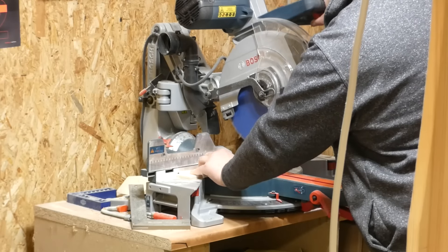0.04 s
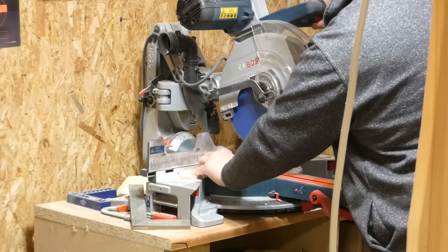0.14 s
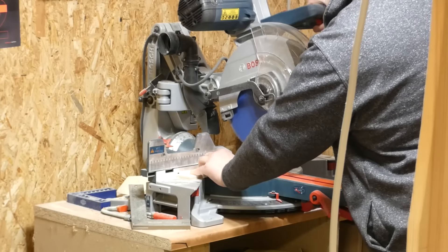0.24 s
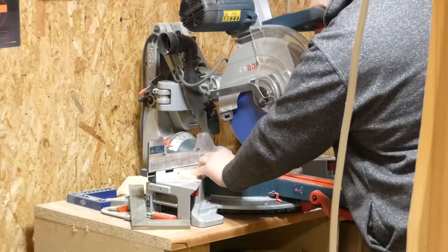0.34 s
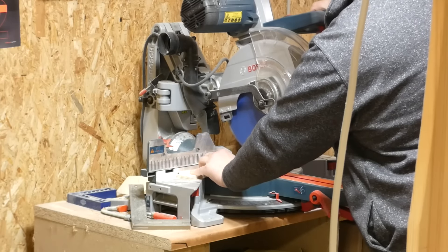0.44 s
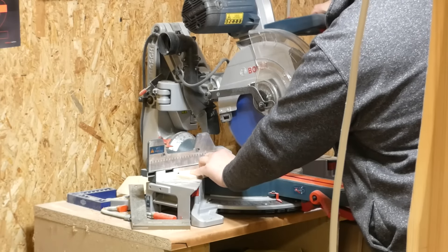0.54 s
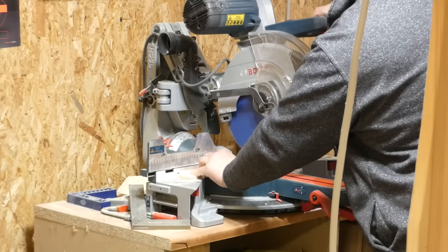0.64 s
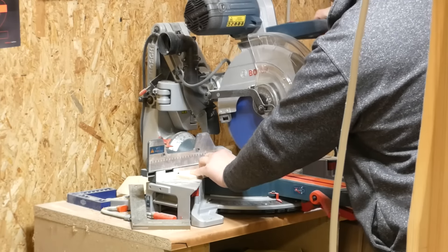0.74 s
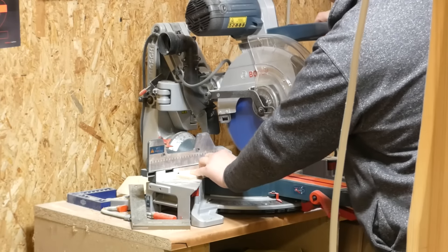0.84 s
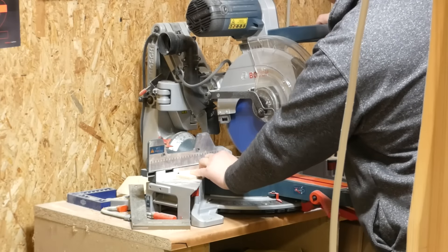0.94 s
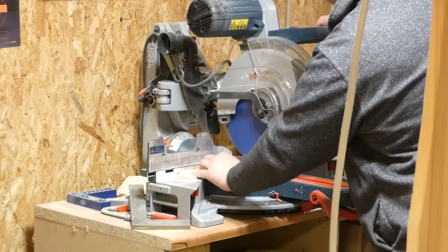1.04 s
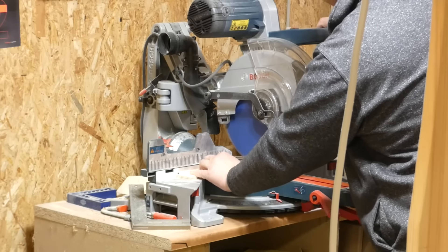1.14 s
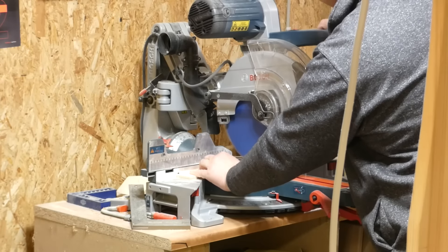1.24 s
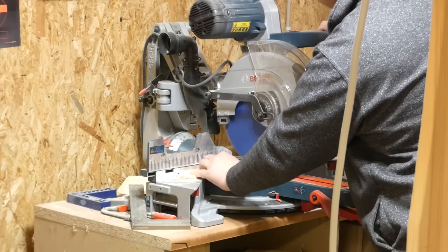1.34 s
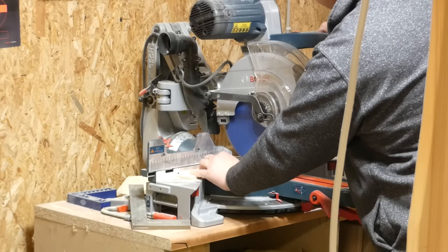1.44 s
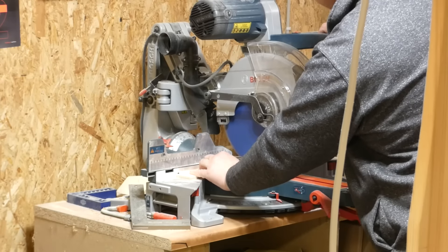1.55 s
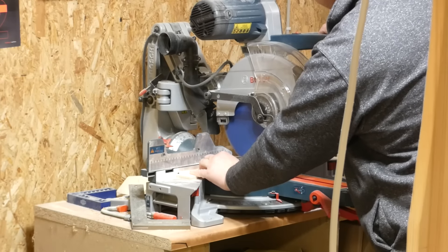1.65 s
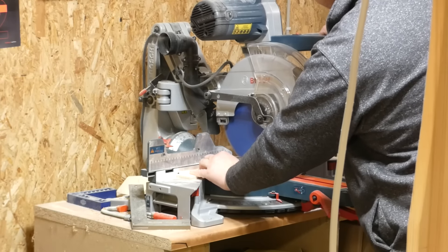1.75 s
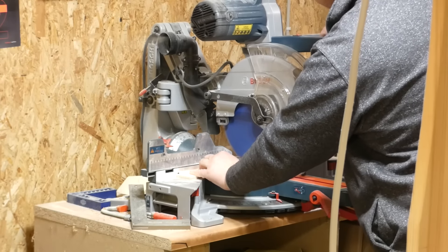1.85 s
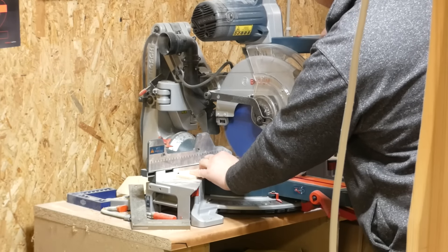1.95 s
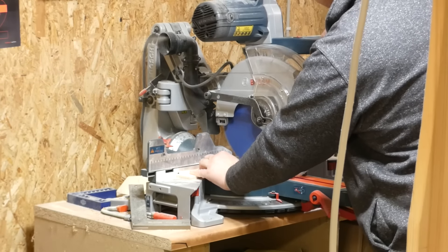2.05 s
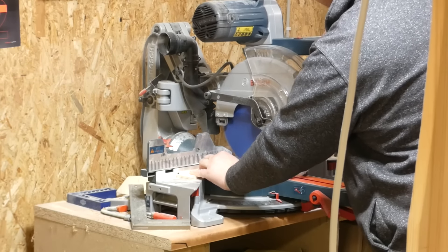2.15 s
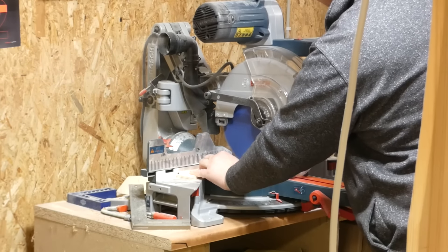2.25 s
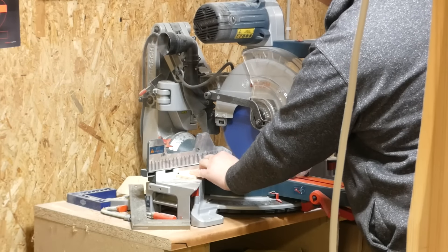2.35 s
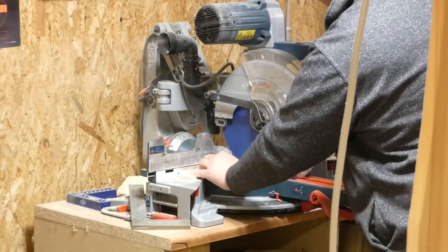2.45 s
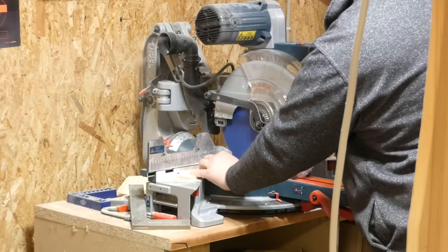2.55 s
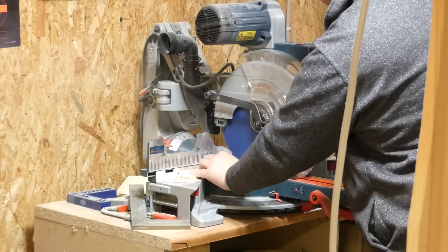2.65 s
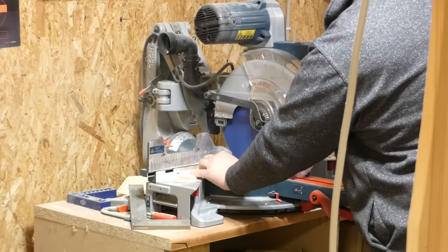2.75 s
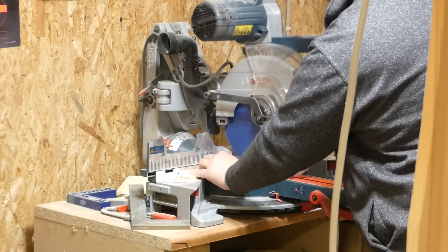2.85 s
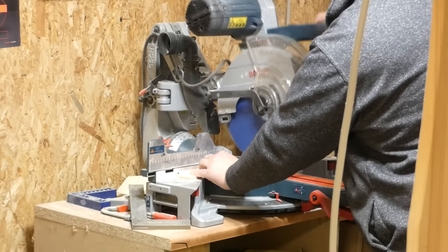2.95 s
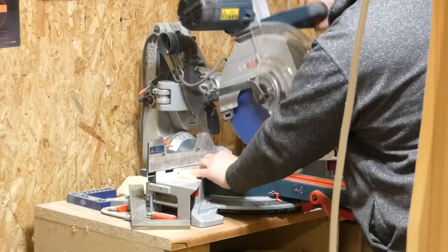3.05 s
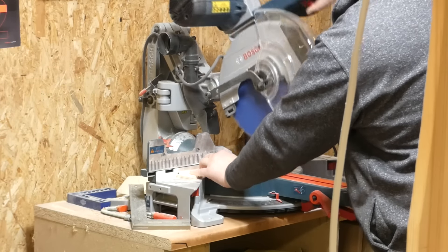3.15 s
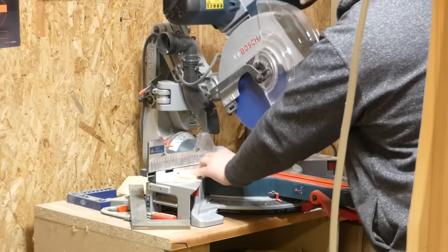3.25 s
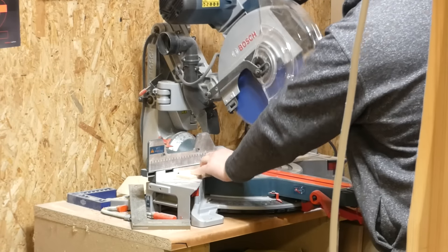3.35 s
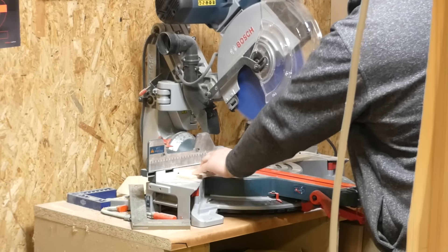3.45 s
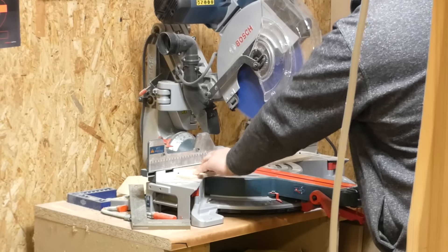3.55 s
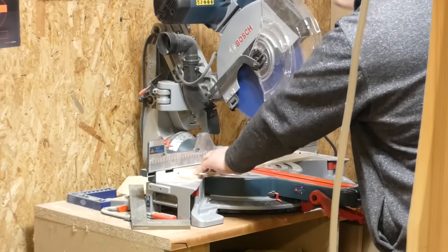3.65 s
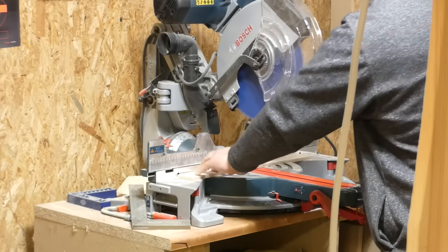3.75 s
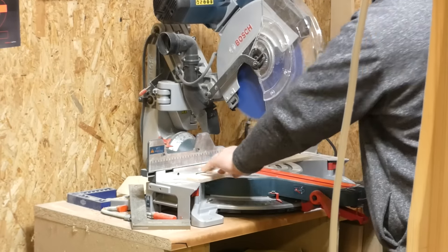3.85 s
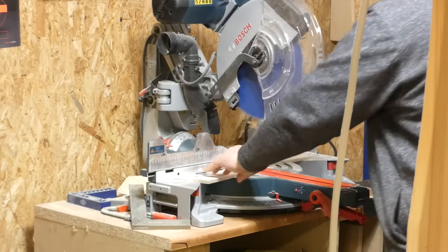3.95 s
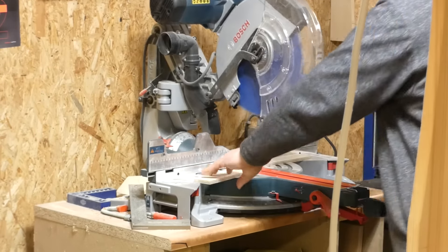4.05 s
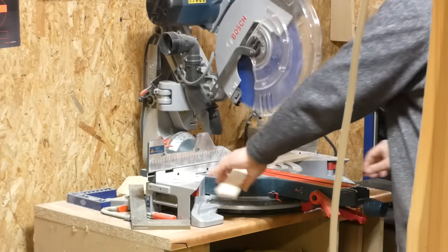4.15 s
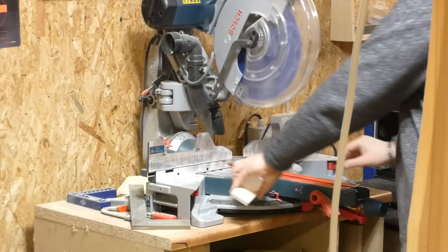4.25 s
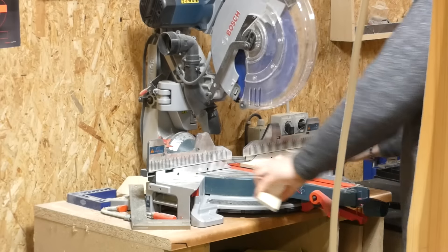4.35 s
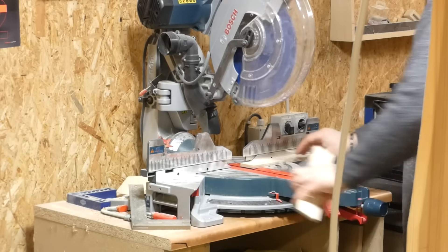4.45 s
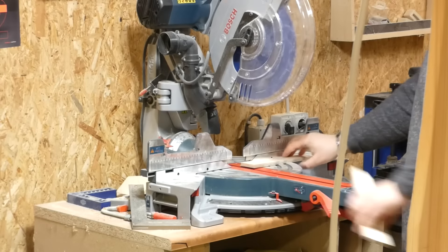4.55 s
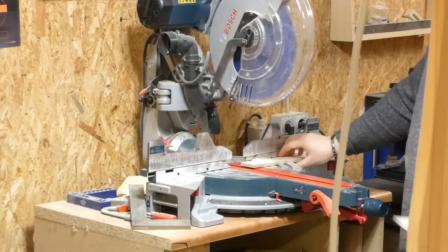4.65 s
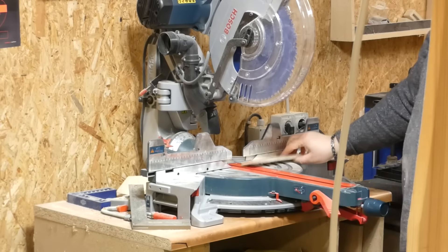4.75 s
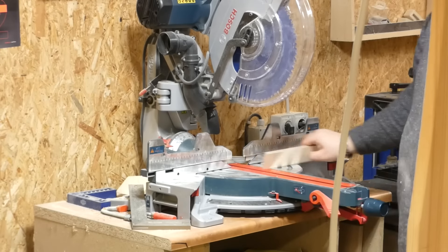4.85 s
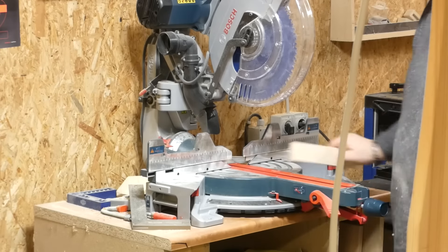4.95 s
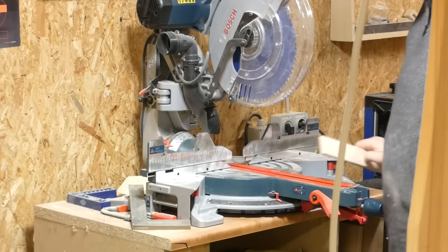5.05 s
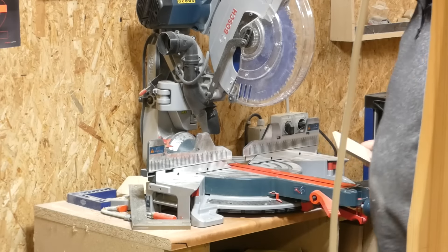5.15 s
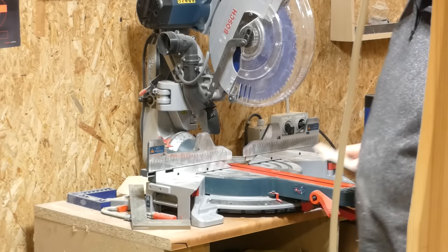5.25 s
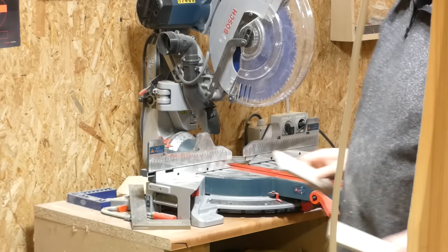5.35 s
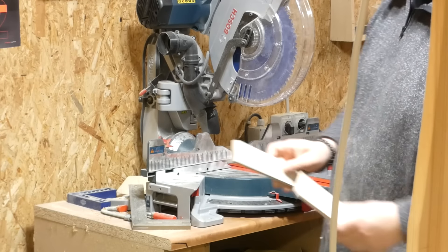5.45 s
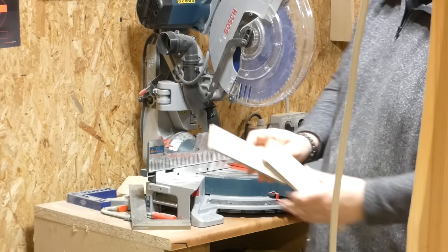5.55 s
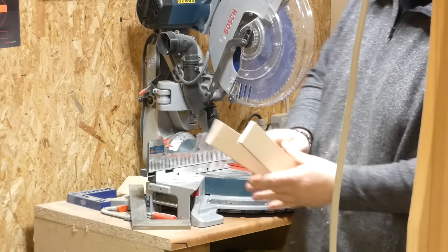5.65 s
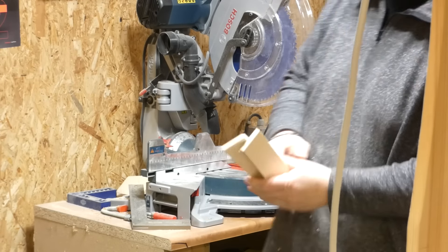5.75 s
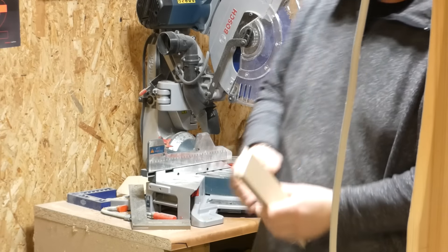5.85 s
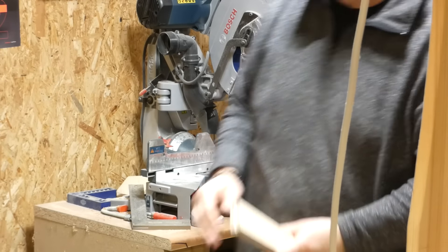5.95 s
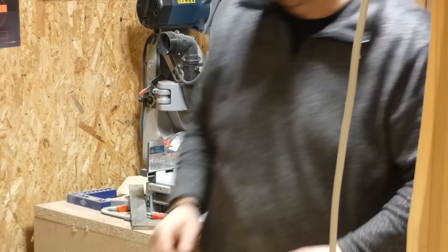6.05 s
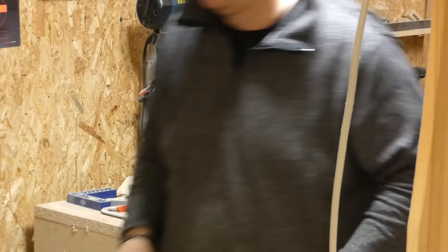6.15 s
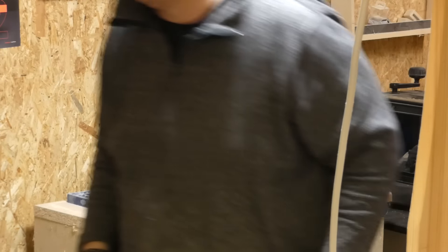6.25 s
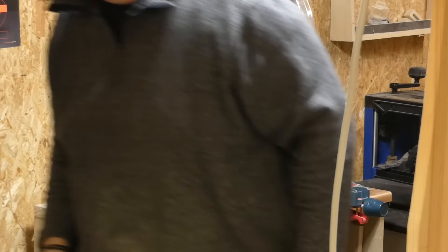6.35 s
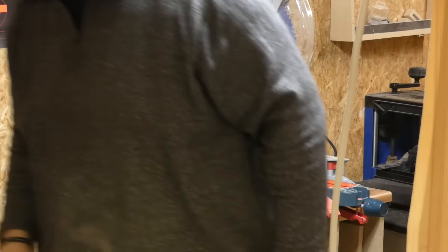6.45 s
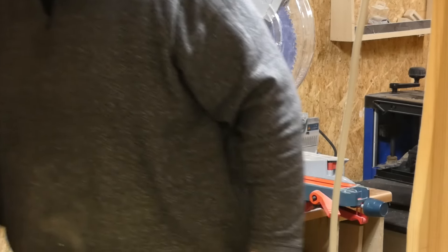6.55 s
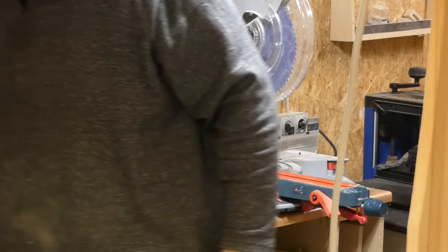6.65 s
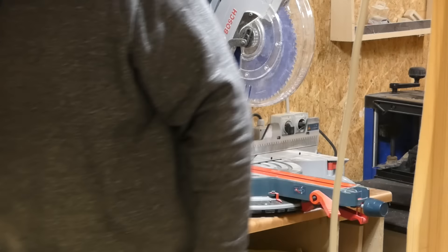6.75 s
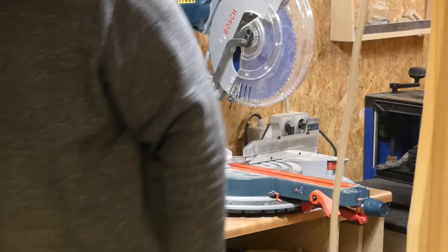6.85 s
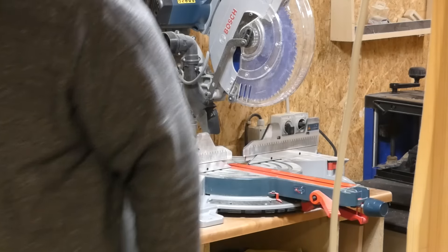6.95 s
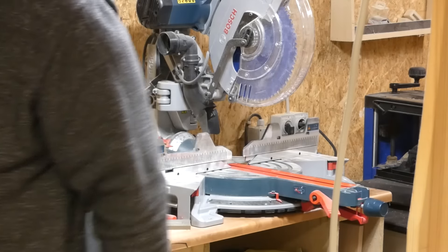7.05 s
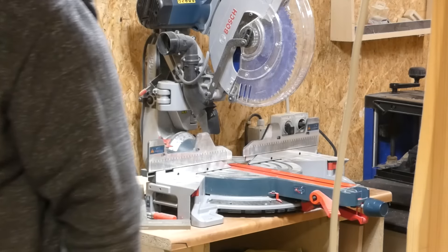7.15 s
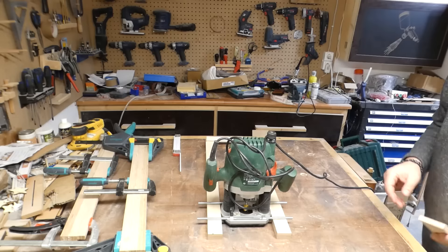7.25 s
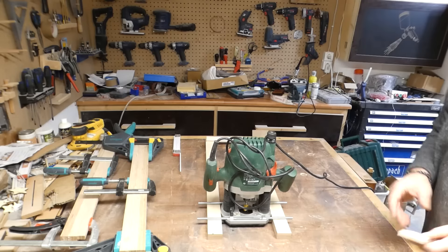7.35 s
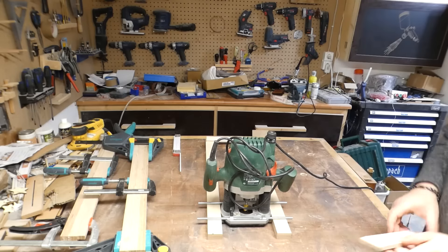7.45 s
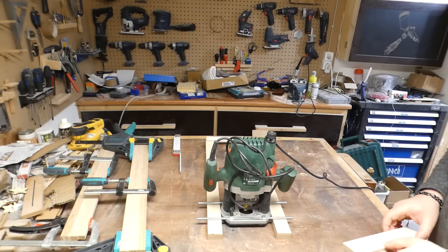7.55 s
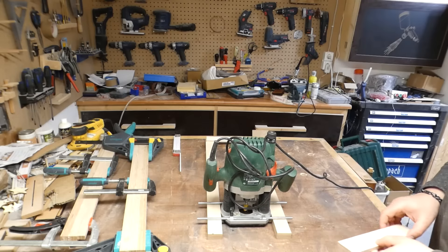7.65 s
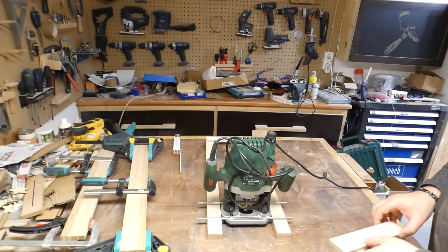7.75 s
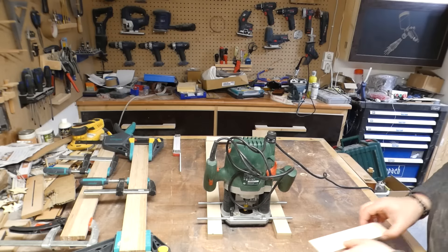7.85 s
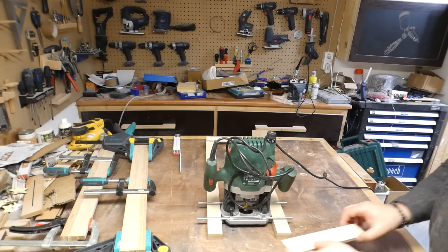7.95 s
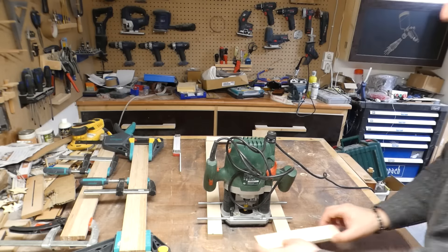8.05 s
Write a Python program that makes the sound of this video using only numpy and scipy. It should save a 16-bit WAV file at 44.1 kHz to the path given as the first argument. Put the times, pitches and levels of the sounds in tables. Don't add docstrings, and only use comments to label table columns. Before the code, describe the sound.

Loud electric saw runs up, bites through wood, slaps and winds down; the head rattles, strips clap sharply, cloth rustles, pieces knock on a bench.

```python
import sys
import numpy as np
from scipy import signal
from scipy.fft import rfft, irfft, next_fast_len
from scipy.io import wavfile
from scipy.ndimage import uniform_filter1d

SR = 44100
rng = np.random.default_rng(int(sys.argv[2]) if len(sys.argv) > 2 else 0)


def to_wav(sig):
    pcm = np.clip(np.atleast_2d(sig), -1, 1) * 32767
    pcm = np.round(pcm).astype(np.int16)
    wavfile.write(sys.argv[1], SR, pcm.T)


def gain_from_decibels(decibels):
    exponent = np.asarray(decibels, float) / 20
    return 10 ** exponent


N = 356622
T = np.arange(N) / SR
RUN = int(4.5 * SR)
FREE_TURNS_S = 292
INRUSH_S, SWITCH_OFF_S, GRAB_S = 0.55, 3.265, .08
FULL_BITE_DB = -40
FADE_S = .07

# frequency [Hz], width [Hz], level [dB].
HOUSING = [(482.5, 13, -2), (563, 8.3, -13), (671, 12, -5.5), (867, 32, -9), (1420, 28, -38),
           (1720, 20, -37), (2050, 87, -19), (2920, 220, -9.5), (4820, 60, -3), (5580, 57, -4),
           (6770, 91, -6.5)]


def columns(table):
    s, *rest = np.transpose(table)
    return [np.interp(T, s, c) for c in rest]


def unit(x):
    return x / np.sqrt(np.mean(x ** 2))


def pan(db):
    return gain_from_decibels([[db / 2], [-db / 2]])


def colour(x, points, lo_hz=1, hi_hz=30000):
    size = next_fast_len(x.shape[-1])
    f = np.arange(size // 2 + 1) * SR / size + 1
    hz, db = np.transpose(points)
    gain = gain_from_decibels(np.interp(np.log(f), np.log(hz), db))
    gain = gain / np.sqrt((1 + (lo_hz / f) ** 6) * (1 + (f / hi_hz) ** 6))
    return irfft(rfft(x, size) * gain, size)[..., :x.shape[-1]]


def band(x, lo_hz=1, hi_hz=30000):
    return colour(x, [(1, 0)], lo_hz, hi_hz)


def resonate(x, peaks):
    return sum(gain_from_decibels(db) * signal.lfilter(*signal.iirpeak(hz, hz / max(width, 4), SR), x)
               for hz, width, db in peaks)


def walk(rate, size=N):
    steps = uniform_filter1d(rng.standard_normal(int(size / SR * rate * 2) + 3), size=2)
    return 1.377 * np.interp(T[:size] * rate * 2, np.arange(len(steps)), steps)


def noise(grain_db=0., size=N):
    return rng.standard_normal(size) * gain_from_decibels(grain_db * walk(900, size=size))


def ring(modes, length_s, scatter):
    t = T[:int(length_s * SR)]
    out = np.zeros(len(t))
    for (hz, db, t60), sign in zip(modes, np.sign(scatter)):
        envelope = np.minimum(t * hz, 1) * gain_from_decibels(-60 * t / max(t60, .003))
        out += sign * gain_from_decibels(db) * np.sin(2 * np.pi * hz * t) * envelope
    return out


def add(out, s, x, pan_db=0):
    i = int(s * SR)
    x = x[:N - i]
    out[:, i:i + len(x)] += x * pan(pan_db)


def bursts(s, db, rise_s, fall_s):
    t = T[::64, None]
    away = np.maximum((s - t) / rise_s, (t - s) / fall_s)
    return np.interp(T, t[:, 0], gain_from_decibels(db - 20 * away).sum(axis=1))


def room(x):
    # centre [Hz], t60 [s], side share [ratio].
    bands = [(58.9, 0.17, .9), (198, 0.88, 0.51), (600, 0.42, 0.88), (2024, 0.55, 0.68), (4300, 0.55, 0.2),
             (8500, 0.14, 0.35), (12000, 0.074, 2.1)]
    # delay [s], level [dB], side [signed].
    echoes = [(.0036, -11.5, 1.1), (.009, -10.5, -1.4), (.016, -7, 1.1), (.033, -7, -1.1)]
    wet_db = -5.5
    t = T[:SR // 2 + 8000]
    mid_side = 0
    for hz, t60, share in bands:
        grain = band(rng.standard_normal((2, len(t))), hz / 2.4, hz * 1.76)
        mid_side = mid_side + grain * gain_from_decibels(-60 * t / t60) * [[1], [share]]
    mid, side = mid_side
    tail = (mid + side * np.array([[1], [-1]])) * np.clip((t - .003) / 0.0041, 0, 1)
    tail = gain_from_decibels(wet_db) * tail / np.sqrt(np.sum(tail ** 2) / 2)
    for s, db, wall in echoes:
        tail[:, int(s * SR)] += gain_from_decibels(db - 13.0 + 2 * wall * np.array([1, -1]))
    return x + signal.fftconvolve(x.mean(axis=0)[None], tail, axes=1)[:, :N]


def mains_hum():
    hum_hz, bench_s = 200.2, 7.275
    run_db, inrush_db, inrush_s = -55, 20.5, 0.334
    idle_db, swell_db, swell_s, bench_db = -65, 9, 1, -47
    motor = gain_from_decibels(run_db + inrush_db * np.exp(-T / inrush_s))
    motor = motor * np.clip(1 - (T - SWITCH_OFF_S) / 0.13, 0, 1)
    swell = np.clip((T - bench_s) / swell_s + 1, 0, 1)
    idle = gain_from_decibels(idle_db + swell_db * swell) * (T > SWITCH_OFF_S)
    bench = gain_from_decibels(bench_db) * np.clip((T - bench_s) / 0.025 + 1, 0, 1)
    hum = (motor + idle + bench) * gain_from_decibels(1.0 + 0.41 * walk(15)) * np.sin(2 * np.pi * hum_hz * T)
    return hum * gain_from_decibels([[-1.8], [1.2]])


def still_air():
    # frequency [Hz], density [dB per Hz].
    spectrum = [(12, -54), (20, -31), (150, -4.5), (198, -4.5), (347, -9), (825, -16), (1090, -14.5),
                (1400, -18.5), (2990, -21), (3440, -30), (9670, -29), (14700, -48.5), (16000, -46.5)]
    air_db = -59
    mid, side = colour(rng.standard_normal((2, N)), spectrum)
    air = unit(mid + 0.67 * side * np.array([[1], [-1]])) * pan(-4)
    return gain_from_decibels(air_db) * air * np.clip((T[-1] - T) / FADE_S, .5, 1)


def rustle():
    # start [s], rustle [dB], low scuff [dB], fall [s per 20 dB].
    moves = [(5.315, -73.5, -61, 1), (5.495, -65.5, -78, 0.03), (5.735, -51, -42.5, -0.01),
             (5.95, -69, -69, 0.32), (6.098, -69, -53, 0.1), (6.286, -74, -69.5, 0.05),
             (6.402, -65.5, -54, 0.05), (6.68, -70, -54.5, 0.14), (6.852, -80, -65, 0.5),
             (6.984, -56, -48, 0.02), (7.027, -73, -43.5, 0.2), (7.14, -67, -74, 0.5),
             (7.273, -61, -40, 0.05), (7.453, -60, -48, 0.15), (7.63, -62, -46, .2),
             (7.39, -52, -39.5, 0.06), (7.543, -53, -39.5, 0.12), (7.724, -56, -51, 0.17),
             (7.816, -42.5, -23.5, 0.06), (7.863, -59, -39, 0.07), (7.902, -54.5, -44, 0.07),
             (7.962, -57.5, -55, 0.14), (8.02, -58, -59, 0.1)]
    # frequency [Hz], density [dB per Hz].
    cloth = [(530, -31), (900, -8.5), (1760, -11), (2130, -6), (3870, -6.5), (4210, -4.5), (11900, -19.5),
             (15000, -41)]
    s, hiss_db, scuff_db, fall_s = np.transpose(moves)
    rise_s = 0.71 * fall_s
    hiss = unit(colour(noise(grain_db=2.5), cloth, lo_hz=1500))
    scuff = unit(band(noise(grain_db=3.), lo_hz=250, hi_hz=1500))
    return bursts(s, hiss_db + 8.5, rise_s, fall_s) * hiss + bursts(s, scuff_db - 6.5, rise_s, fall_s) * scuff


def knock(hz, spread, t60, chance):
    place = np.linspace(-1, 1, 14) + chance[0] / 14
    mode_hz = hz * 2 ** (spread * place)
    mode_db = 4 * chance[1] - 9 * place ** 2
    thud = ring(np.c_[mode_hz, mode_db, t60 * 2 ** (.5 * chance[2])], .25, chance[2])
    t = T[:len(thud)]
    thud *= np.clip(t / min(.3 / (hz * spread ** 1.5), .002), 0, 1) * np.clip((t[-1] - t) / .08, 0, 1)
    contact = signal.lfilter([1], [1, -.7], rng.standard_normal(900)) * gain_from_decibels(-60 * T[:900] / 0.016)
    thud[:900] += 0.4 * min(spread, 1) ** 2 * contact
    edges_hz = [hz * 2 ** -spread / 2, min(hz * 2 ** spread * 3, 15000)]
    thud = signal.sosfilt(signal.butter(2, edges_hz, "band", fs=SR, output="sos"), thud)
    return thud / np.abs(thud).max()


def knocks():
    # start [s], peak [dB], pitch [Hz], spread [octaves], t60 [s].
    thuds = [
        (4.6, -45, 144, 0.26, 0.65),
        (4.8, -48, 140, 0.24, 0.6),
        (5.43, -62.5, 65.6, 0.27, .46),
        (6.98, -54, 95, 0.45, .2),
        (7.37, -46, 121, 0.38, 0.2),
        (7.83, -55, 80, 0.5, 0.3),
    ]
    bench = [(6.102, -36.5, 225, 0.82, 0.11), (6.103, -39, 698, 1.35, 0.066),
             (6.9507, -36.5, 503, 1.42, 0.094), (6.97, -47, 1620, 1.5, 0.037), (7.002, -38, 1540, 1, .04),
             (7.021, -32.5, 389, 1.33, 0.091), (7.024, -30, 1803, 1.3, 0.039),
             (7.036, -38, 2400, 0.92, 0.051), (7.252, -30.5, 843, 0.63, 0.067),
             (7.253, -37, 2190, 0.55, 0.047), (7.362, -31.5, 480, 0.79, 0.2), (7.525, -33, 4400, 1.3, .03),
             (7.5525, -24, 2870, 0.61, 0.026), (7.558, -30, 2700, 0.54, 0.037),
             (7.612, -35, 600, 0.83, 0.12), (7.788, -39, 805, 0.93, 0.06), (7.803, -36, 905, 2.2, 0.06),
             (7.817, -22, 901, 1.85, 0.06), (7.826, -26, 227, 0.56, 0.13), (7.848, -33, 296, 1.27, 0.094),
             (7.868, -35, 302, 1.06, 0.08), (7.885, -38, 323, 1.34, 0.08), (7.994, -31, 627, 0.48, 0.032)]
    at_saw = [(4.334, -23, 3000, 1.63, 0.024), (4.339, -26, 694, 0.9, .03), (4.4575, -27, 1860, 0.26, .06),
              (4.547, -37, 8000, 0.63, .012), (4.547, -26, 3900, 0.28, 0.02),
              (4.584, -29, 1800, 1.4, 0.059), (4.588, -37, 665, 0.42, .09), (4.765, -43, 563, 0.44, 0.087),
              (5.46, -51, 2880, 0.044, 0.38), (5.47, -52, 1630, 0.13, 0.13),
              (5.589, -50.5, 712, 0.38, 0.36)]
    catch = [
        (4.83, -45, 4220, .12, .06),
        (4.848, -40, 4220, .12, .04),
        (4.863, -25, 4200, .11, .018),
        (4.863, -30, 6150, .11, .018),
        (4.863, -39, 8000, .07, .014),
        (4.87, -43, 4200, .1, .1),
        (4.863, -36, 2300, .4, .03),
    ]
    gear_slaps = [
        (.004, -19, 650, .3, .2),
        (.004, -21, 1780, .08, .09),
        (3.257, -15, 2280, .1, .02),
        (3.304, -10, 2050, .07, .018),
        (3.327, -16, 2050, .1, .018),
    ]
    out = np.zeros((2, N))
    groups = [(thuds, -3), (bench, -3), (at_saw, -0.5), (catch, -0.5), (gear_slaps, 0)]
    for rows, pan_db in groups:
        for s, db, hz, spread, t60 in rows:
            chance = rng.uniform(-1.2, 1, (3, 14))
            add(out, s, gain_from_decibels(db) * knock(hz, spread, t60, chance), pan_db)
    return out


def strip_clap():
    # start [s], peak [dB].
    contacts = [
        (5.751, -4.5),
        (5.7543, -7),
        (5.76, -12),
    ]
    # frequency [Hz], level [dB], t60 [s].
    strip = [(1585, -10, .012), (2050, -10, .007), (2350, -10, .008), (2880, 0, .028), (3120, 0, .01),
             (3375, -1, .008), (3695, -5, .008), (4270, -6, .03), (4390, -6, .024), (4590, -9, .012),
             (5146, -4, .007), (5850, -5, .006), (6600, -9, .007), (9800, -16, .003)]
    out = np.zeros((2, N))
    edges = signal.butter(2, [250, 8000], "band", fs=SR, output="sos")
    for s, db in contacts:
        chance = rng.standard_normal(len(strip))
        clap = ring(np.array(strip) + np.outer(chance, [25, 1, 0]), .1, chance)
        clap[:400] += 0.75 * rng.standard_normal(400) * gain_from_decibels(-60 * T[:400] / 0.0047)
        add(out, s, gain_from_decibels(db) * signal.sosfilt(edges, clap))
    return out


def rattle():
    # time [s], frame ring [dB], rattle hiss [dB].
    bounces = [(4.342, -23.5, -38), (4.361, -20.5, -24.5), (4.387, -27, -38), (4.43, -47, -58),
               (4.474, -33, -32), (4.54, -47, -34), (4.597, -26, -30), (4.66, -46, -57),
               (4.765, -39.5, -50), (4.81, -42, -44), (4.872, -42, -33.5), (5.49, -75, -62),
               (5.595, -53, -65)]
    # frequency [Hz], width [Hz], level [dB].
    frame_modes = [(161, 16, -18), (209.7, 43, -13), (430, 13, -14), (490, 8, 1), (576, 45, 5),
                   (654, 7, -5.5), (712, 19.6, 4), (870, 13, -0.5), (950, 51, -10), (997, 14, -22),
                   (1200, 46, -14.5), (1540, 26, -23), (1767, 28, -10), (2620, 61, -17.5), (2800, 55, -26),
                   (3090, 100, -41)]
    # frequency [Hz], density [dB per Hz].
    hiss_spectrum = [(900, -21), (1770, -7.5), (3000, -14), (5480, -23), (9460, -34.5), (12000, -46),
                     (15000, -62)]
    rise_s, fall_s, still_s = 0.014, 0.043, 5.5
    s, ring_db, hiss_db = np.transpose(bounces)
    since = T - s[0]
    on = np.clip(since / fall_s, 0, 1) * np.clip((still_s - T) / 0.2, 0, 1)
    ringing = bursts(s, ring_db, rise_s, fall_s) + on * gain_from_decibels(-31.5 - 20.5 * since)
    chatter = bursts(s, hiss_db, 2.3 * rise_s, 1.17 * fall_s) + on * gain_from_decibels(-40.5 - 44.5 * since)
    frame = unit(band(resonate(noise(grain_db=2.5), frame_modes), lo_hz=100, hi_hz=3410))
    hiss = unit(colour(noise(grain_db=2.0), hiss_spectrum, lo_hz=1350))
    return gain_from_decibels(1.5) * ringing * frame + gain_from_decibels(-2.5) * chatter * hiss


def motor_speed():
    # time [s], speed lost [turns per s].
    load = [
        (1.25, 0),
        (1.45, 3.8),
        (1.62, 3.9),
        (1.8, 5.8),
        (1.96, 11.5),
        (2.4, 17),
        (2.6, 13.5),
        (3, 1),
        (3.2, 0),
    ]
    run_up_gap, run_up_s = 190, .43
    coast_s, grab_share = .413, .157
    off = np.maximum(T - SWITCH_OFF_S, 0)
    driven = FREE_TURNS_S - run_up_gap * np.exp(-T / run_up_s) - columns(load)[0]
    braked = (1 - grab_share) * np.exp(-off / coast_s) + grab_share * np.exp(-off / GRAB_S)
    return (driven * braked)[:RUN]


def part_level(part, speed, bite_db):
    t = T[:RUN]
    off = np.maximum(t - SWITCH_OFF_S, 0)
    cutting = np.clip(1 + (bite_db - FULL_BITE_DB) / 20, 0, 1)
    grab = np.exp(-(2 * (t - SWITCH_OFF_S) / GRAB_S) ** 2)
    coasting_db = 20 * np.log10(speed / FREE_TURNS_S) * (off > 0)
    power_off = 1 - np.exp(-off / GRAB_S)
    drives = [np.ones(RUN), np.exp(-t / INRUSH_S), cutting, power_off, coasting_db, -off ** 2, grab]
    return np.array(part) @ drives


def lines(orders, speed, turns, steady=1.):
    out = 0
    for k, db, blur_hz in orders:
        phase = 2 * np.pi * k * turns
        rate = max(blur_hz, 5)
        wobble = (steady + walk(rate, size=RUN)) * np.sin(phase) + walk(rate, size=RUN) * np.cos(phase)
        out = out + gain_from_decibels(db) * wobble * np.clip(4 - k * speed / 4000, 0, 1)
    return out


def casing_wash(turns, rumble_db, roar_db, hiss_db, powered_db):
    # frequency [Hz], density [dB per Hz].
    roar = [(24, -72.5), (40, -35.5), (96, -47), (127, -29), (194, -21.5), (345, -19), (467, -8.5),
            (680, -5), (733, -4.5), (1020, -9.5), (1850, -4.5), (2080, -3), (3200, -3.5), (6650, -8),
            (8130, -14.5), (9220, -11), (16000, -38)]
    # frequency [Hz], width [Hz], level [dB].
    shell = [(738, 40, 0), (2160, 90, -2)]
    shell_db = -6
    press_on_s, press_off_s, press_db = 1.62, 2.38, -8
    t = T[:RUN]
    shake = noise(grain_db=1.0, size=RUN) * (1 + 0.15 * np.sin(2 * np.pi * turns))
    body = colour(shake + 1.14 * resonate(shake, HOUSING), roar)
    wash = gain_from_decibels(rumble_db + 2.34 * walk(8.45, size=RUN)) * unit(band(body, hi_hz=1534))
    wash += gain_from_decibels(roar_db - 4.5 + 1.5 * walk(12, size=RUN)) * unit(band(body, lo_hz=1470, hi_hz=5200))
    wash += gain_from_decibels(hiss_db - 0.5 + 1.14 * walk(10, size=RUN)) * unit(band(body, lo_hz=6000))
    pressed = np.clip(np.minimum(t - press_on_s, press_off_s - t) / .08, 0, 1)
    tone_db = powered_db + shell_db + press_db * pressed + 4 * walk(9, size=RUN)
    return wash + gain_from_decibels(tone_db) * unit(resonate(resonate(shake, shell), shell))


def fan_swirl(speed, turns, swirl_db):
    # multiple of motor speed [ratio], level [dB], blur [Hz].
    swirl = [(5.484, -10, 400), (7.965, -3.5, 400), (9.515, -1.5, 500), (10.964, -0.5, 500),
             (12.45, -3, 400), (16.1, -9.5, 300), (21, -14.5, 300), (31.65, -21, 500)]
    return gain_from_decibels(swirl_db) * lines(swirl, speed, turns, steady=0)


def motor_whine(speed, turns, gear_db, slot_db, bars_db):
    # multiple of motor speed [ratio], level [dB], blur [Hz].
    gear = [(8, 0, 115)]
    slots = [(16, -1, 220), (21, -3, 200), (24, -16, 120)]
    commutator = [(32, 2, 230), (48, -18, 200), (64, -6, 380), (96, -8.5, 380), (128, -9, 340),
                  (160, -11, 380), (192, -12, 400)]
    # frequency [Hz], gain [dB].
    gear_case = [(400, -2), (700, -2), (960, 3.5), (1250, -1), (1550, 1), (1800, -10), (2000, 4),
                 (2400, -1)]
    slot_case = [(2000, -9), (2650, 2), (3150, 2), (3600, -10), (4400, -8), (4800, 3), (5200, -4),
                 (7000, -6)]
    bar_case = [(2000, 1), (4000, -1), (5200, 1), (5700, -3), (6500, -1), (8000, -1), (9200, 3)]
    bars_wake_db = -10 * np.exp(-(T[:RUN] / .09) ** 2)
    whine = gain_from_decibels(gear_db - 3) * colour(lines(gear, speed, turns), gear_case)
    whine += gain_from_decibels(slot_db - 3) * colour(lines(slots, speed, turns), slot_case)
    bars = colour(lines(commutator, speed, turns), bar_case, lo_hz=1900)
    whine += gain_from_decibels(bars_db - 3 + bars_wake_db) * bars
    whine = whine + .9 * resonate(whine, HOUSING)
    return colour(whine, [(300, -15), (550, 0), (5500, 0), (9000, -8), (15000, -25)])


def unbalance_throb(turns, throb_db):
    # multiple of motor speed [ratio], level [dB].
    unbalance = [(.5, -53), (1, -50), (2, -54)]
    throb = sum(gain_from_decibels(db + 5.2 * walk(2.2, size=RUN)) * np.sin(2 * np.pi * k * turns) for k, db in unbalance)
    return gain_from_decibels(throb_db) * throb


def blade_plate(blade_db):
    # frequency [Hz], width [Hz], level [dB].
    plate = [(4780, 250, -9), (5020, 120, -4.5), (2190, 130, -11), (6540, 120, -7)]
    return gain_from_decibels(blade_db) * unit(resonate(resonate(rng.standard_normal(RUN), plate), plate))


def tooth_bite(turns, bite_db):
    # multiple of tooth rate [ratio], level [dB].
    overtones = [(2, -45), (3, -51), (4, -52)]
    phase = 2 * np.pi * 13.668 * turns
    upper = sum(gain_from_decibels(db + 2.5 * walk(7, size=RUN)) * np.sin(k * phase) for k, db in overtones)
    bite = gain_from_decibels(bite_db + 1.5 * walk(14, size=RUN)) * np.sin(phase)
    return gain_from_decibels(5) * (bite + gain_from_decibels(np.minimum(bite_db - FULL_BITE_DB, 0)) * upper)


def saw():
    # time [s], level [dB].
    bite = [(1.37, -70), (1.4, -38), (1.45, -29), (1.52, -29), (1.55, -40), (1.61, -38), (1.67, -30),
            (1.79, -29), (1.835, -35), (2, -34), (2.05, -39), (2.08, -31), (2.3, -33), (2.4, -36),
            (2.44, -41), (2.58, -45), (2.63, -80)]
    # running [dB], inrush [dB], cutting [dB], power-off step [dB],
    # coasting [dB per dB of speed], dying [dB per s squared], brake grab [dB].
    rumble = (-29, 5.5, -2, -6.5, 0.58, -1.5, -1)
    fan = (-24, -0.5, -2.5, -9.5, 0.6, 7, 0.5)
    brushes = (-31.5, 2.5, 4, -1, 1.07, 1, -0.5)
    swirling = (-28, -3.5, -1.5, -1.5, 1.1, 45.5, -5)
    gears = (-34, 5, -.5, 5.5, 0, 46, 8)
    slotting = (-37, 12, -.5, -14, 0, 46, -2)
    bars = (-38.5, 11.5, -.5, 4.5, 0, 12, -6)
    throb = (-3, -40, -2, -40, 0, 0, 4)
    plate = (-44, 0, 0, 4, 0, 25, 0)
    t = T[:RUN]
    speed, bite_db = motor_speed(), columns(bite)[0][:RUN]
    turns = np.cumsum(speed * (1 + .001 * walk(40, size=RUN))) / SR

    def level(part):
        return part_level(part, speed, bite_db)

    rumble_db = level(rumble)
    powered_db = rumble_db - rumble[1] * np.exp(-t / INRUSH_S) - 40 * np.maximum(t - SWITCH_OFF_S, 0)
    sound = casing_wash(turns, rumble_db, level(fan), level(brushes), powered_db)
    sound += fan_swirl(speed, turns, level(swirling))
    sound += motor_whine(speed, turns, level(gears), level(slotting), level(bars))
    sound += unbalance_throb(turns, level(throb))
    sound += blade_plate(level(plate))
    sound += tooth_bite(turns, bite_db)
    return np.r_[sound * np.clip((4.45 - t) / .1, 0, 1), np.zeros(N - RUN)]


def scene():
    bleed_db, bleed_hz, bleed_s = -4, 10500, .0011
    near = saw() * pan(-.8) + rattle() * pan(-2) + rustle() * pan(-3.6)
    heard = room(gain_from_decibels(-2.0) * near + knocks() + strip_clap())
    late = np.roll(heard.mean(axis=0), int(bleed_s * SR))
    bleed = colour(late, [(1, 0.00094)], lo_hz=bleed_hz)
    heard = heard * np.clip((T[-1] - T) / FADE_S, .35, 1)
    return heard + gain_from_decibels(bleed_db) * bleed * np.array([[1], [-1]]) + mains_hum() + still_air()


def band_limit(x):
    return signal.sosfilt(signal.butter(12, 16530, fs=SR, output="sos"), x)


def record(dry):
    ceiling, top_hz, low_cut_hz = 1.3, 15450, 30
    top = signal.ellip(8, .3, 60, top_hz + 130, fs=SR, output="sos")
    low = signal.butter(2, low_cut_hz, "high", fs=SR, output="sos")
    mix = signal.sosfilt(np.r_[top, low], ceiling * np.tanh(dry / ceiling))
    return band_limit(mix)


dry = scene()
out = record(dry)
to_wav(out)
```